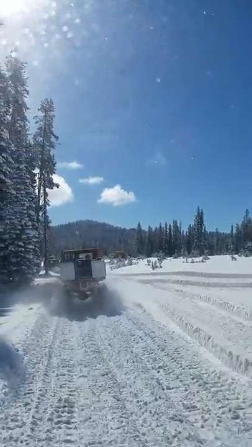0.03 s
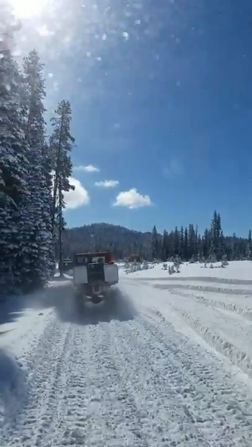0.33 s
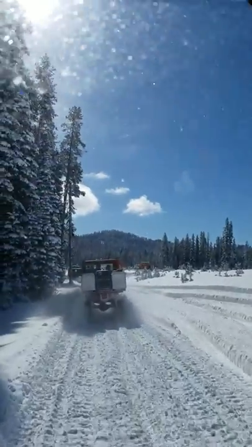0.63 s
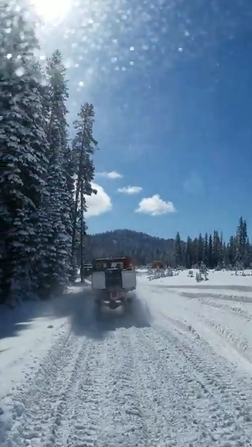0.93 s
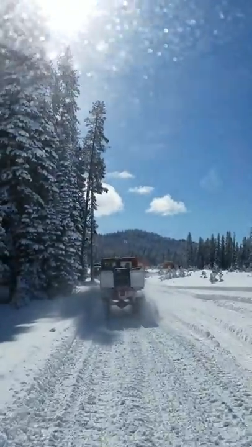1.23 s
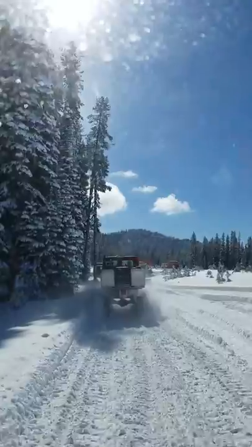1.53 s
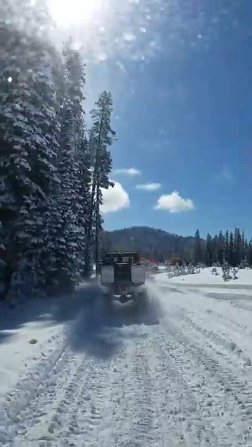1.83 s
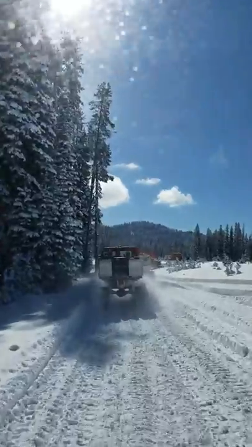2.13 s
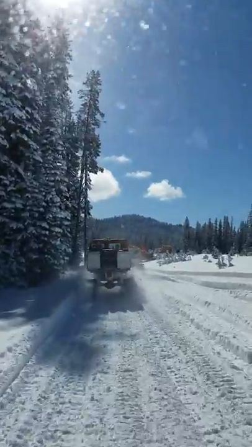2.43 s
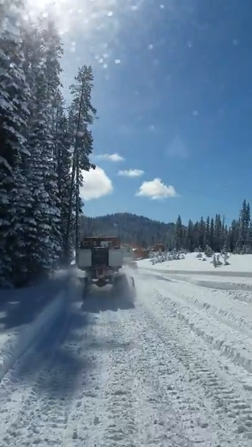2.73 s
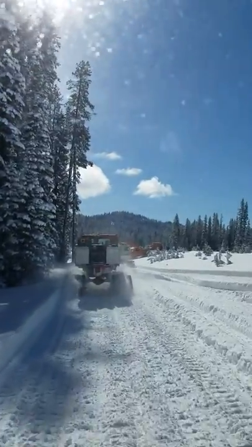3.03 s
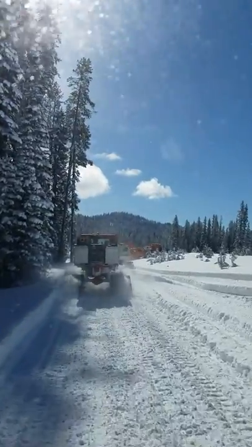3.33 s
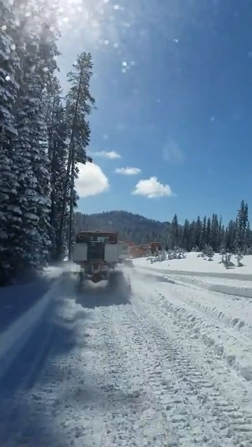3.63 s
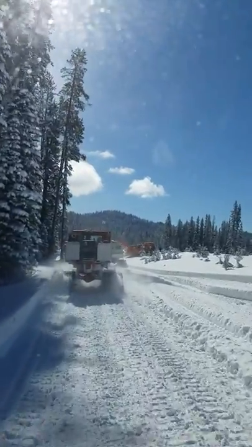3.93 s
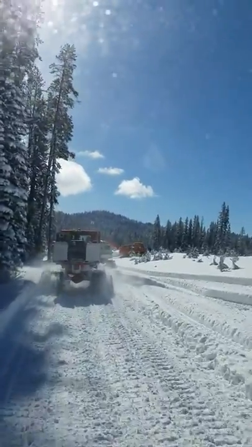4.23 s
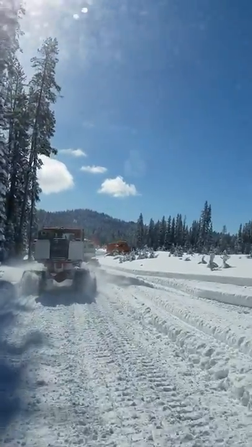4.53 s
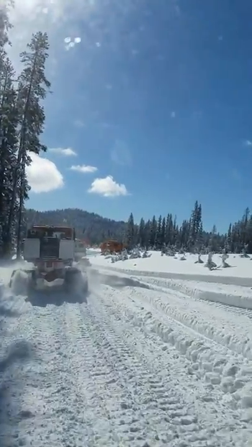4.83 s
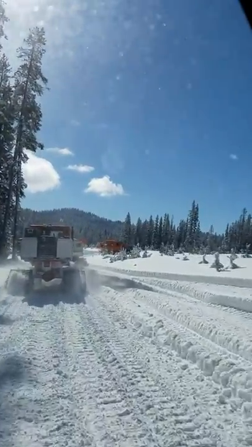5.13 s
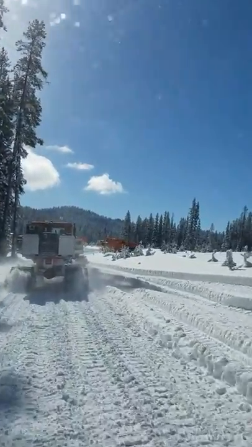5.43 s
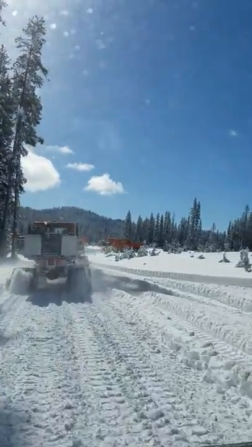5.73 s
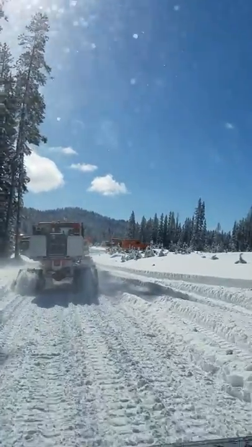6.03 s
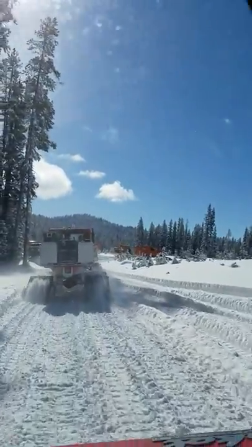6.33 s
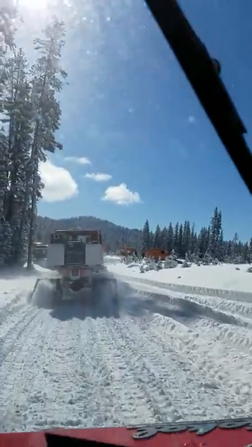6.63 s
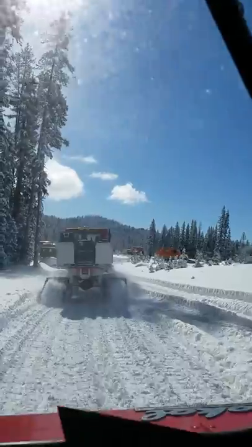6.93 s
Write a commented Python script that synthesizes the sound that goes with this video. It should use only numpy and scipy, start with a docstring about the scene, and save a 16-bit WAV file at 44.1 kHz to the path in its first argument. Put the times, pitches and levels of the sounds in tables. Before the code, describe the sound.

A tracked snow vehicle travels at an even pace, heard from inside its cab. The engine and tracks make a heavy, throbbing rumble with a very fast beat, while a thin gear whine comes and goes above grinding clatter and soft snow hiss. Irregular knocks and sharp rattles come from the hull and fittings, busier in the second half. A wiper makes one soft sweep at the end, and the bass slightly overloads the microphone.

```python
"""A deep, rapid thumping and boom fill the cab of a snowcat on a packed snow trail.
Track cleats drive the hull periodically, so it sounds harmonics of their rate; a meshing gear whines.
Links clatter and snow hisses as random forces coloured by the cab's panels. Struck fittings, links
and trim ring in damped modes, and a wiper rubs once across the windscreen.
The deepest thumps overload a microphone, so that the hiss sputters."""
import sys
import numpy as np
from scipy import signal
from scipy.fft import rfft, irfft, next_fast_len
from scipy.io import wavfile
from scipy.ndimage import uniform_filter1d

SR = 44100
rng = np.random.default_rng(int(sys.argv[2]) if len(sys.argv) > 2 else 0)


def master_out(mix):
    """Clip the mix to full scale and print it as 16-bit PCM to the path in sys.argv[1]."""
    frames = np.transpose(np.atleast_2d(mix))
    ceiling = np.clip(frames, -1, 1)
    pcm = np.round(ceiling * 32767).astype(np.int16)
    wavfile.write(sys.argv[1], SR, pcm)


N = 312669
TIME = np.arange(N) / SR
AGE = TIME[:SR // 5]  # time since a blow
FFT_SIZE = next_fast_len(N + 4096)
FREQ_HZ = np.maximum(np.arange(FFT_SIZE // 2 + 1) * SR / FFT_SIZE, 1)


def from_db(db):
    """Amplitude ratio: tenfold for every 20 dB."""
    return 10 ** (np.asarray(db) / 20)


def unit_rms(x):
    """Normalisation to unit mean power."""
    return x / np.sqrt(np.mean(x ** 2) + 1e-20)


def stereo(right_db):
    """Level difference between the microphones, as left and right gains."""
    return from_db([[0], [right_db]])


def over_time(points):
    """Linear interpolation in time."""
    return np.interp(TIME, *np.transpose(points))


def over_frequency(points):
    """Linear interpolation on a log-frequency axis."""
    hz, value = np.transpose(points)
    return np.interp(np.log(FREQ_HZ), np.log(hz), value)


def swell(centre_s, half_s):
    """Gaussian envelope, down to 1/e at half_s from its centre."""
    return np.exp(-((TIME - centre_s) / half_s) ** 2)


def drift(cutoff_hz):
    """Slow random fluctuation: low-passed noise of rms 1."""
    spectrum = rfft(rng.standard_normal(FFT_SIZE)) / (1 + (FREQ_HZ / cutoff_hz) ** 4)
    return unit_rms(irfft(spectrum, FFT_SIZE)[:N])


def impacts(per_s, spread_db):
    """Shot noise: random contacts of uneven size on each side, rms 1."""
    sizes = from_db(spread_db * np.minimum(rng.exponential(1, (2, N)), 4))
    signs = rng.choice([-1, 1], (2, N))
    return unit_rms(sizes * signs * (rng.random((2, N)) < per_s / SR))


def add(out, start_s, sound):
    """Superposition of a short sound at its time."""
    start = int(start_s * SR)
    out[start:start + len(sound)] += sound[:N - start]


def struck(modes, scale, uneven_db, contact_s=0.0005):
    """Free vibration: a blow excites damped modes unevenly; scale multiplies their frequencies."""
    ring = 0
    for k, (frequency, level_db, t60_s) in enumerate(modes):
        decay = from_db(level_db + uneven_db * rng.standard_normal() - 60 * AGE / t60_s)
        ring += (-1) ** k * decay * np.sin(2 * np.pi * scale * frequency * AGE)
    return ring * np.minimum(AGE / contact_s, 1)


def resonant_noise(rows):
    """Random excitation of resonances: each band of noise swells and fades."""
    out = np.zeros((2, N))
    for centre_s, half_s, level_db, hz, width_hz in rows:
        resonance = 1 / (1 + ((FREQ_HZ - hz * hz / FREQ_HZ) / width_hz) ** 2)
        band = irfft(rfft(rng.standard_normal((2, FFT_SIZE))) * resonance, FFT_SIZE)[:, :N]
        out += unit_rms(band) * from_db(level_db) * swell(centre_s, half_s)
    return out


# panel resonances: centre_hz, width_hz, left_db, right_db
PANEL_MODES = [(313, 20, 1, 4), (332, 17, 4.5, -1), (390, 21, 1.5, 12), (499, 45, 3.5, 6), (576, 11, -6, 6),
               (800, 47, 2, -2.5), (885, 30, 2, 0), (977, 24, -0.5, -7), (1004, 23, -2, 0),
               (1093, 26, 1.5, -17), (1240, 23, 1, -6), (1365, 27, 7, 7.5), (1440, 21, 4.5, 8),
               (1516, 42, 5, 7), (1710, 48, -2, 9.5), (2400, 79, 1.5, -1), (3580, 44, -4, 10),
               (5940, 38, 2, 3), (7440, 66, 5.5, -5), (12140, 130, -15, 2)]
# right microphone relative to left: frequency_hz, gain_db
RIGHT_BALANCE = [(28, 3.5), (70, -7), (170, -5), (360, -10.5), (900, -5), (1400, -4.5), (2500, -9.5),
                 (4500, -10.5), (6300, -16), (7400, -16.5), (8700, -4), (11000, -15), (12100, -16),
                 (14500, 0)]
# likeness of left and right: frequency_hz, correlation
CORRELATION = [(30, 0.42), (140, 0.89), (270, 0.63), (380, 0.72), (900, 0.33), (1500, -0.41), (2500, 0.11),
               (5000, -0.025), (6300, -0.51), (7400, 0.16), (9000, -0.059)]
# the cab's countless small modes roughen its response at each microphone
RIPPLE = uniform_filter1d(rng.standard_normal((2, len(FREQ_HZ))), size=400) * np.sqrt(400)
def cab(force, spectrum, ripple_db=2):
    """Source and filter: two white forces take a source's spectrum, then the cab's resonances."""
    mid, side = rfft(force, FFT_SIZE)
    alike = over_frequency(CORRELATION)
    pair = np.sqrt((1 + alike) / 2) * mid + np.sqrt((1 - alike) / 2) * side * [[1], [-1]]
    midrange = FREQ_HZ / (FREQ_HZ + 600) / (1 + (FREQ_HZ / 8000) ** 2)
    colour_db = over_frequency(spectrum) + over_frequency(RIGHT_BALANCE) * [[0], [1]]
    colour_db += ripple_db * RIPPLE * midrange
    for hz, width_hz, left_db, right_db in PANEL_MODES:
        colour_db += np.array([[left_db], [right_db]]) / (1 + (2 * (FREQ_HZ - hz) / width_hz) ** 2)
    return irfft(pair * from_db(colour_db), FFT_SIZE)[:, :N] * np.sqrt(SR / 2)


# a high sizzle: centre_s, half_length_s, level_db, pitch_hz, width_hz
SIZZLE_BAND = [(3.2, 0.33, -44.5, 7100, 200)]
def sizzle():
    """Narrow-band noise: a thin sizzle swells on a hard stretch of trail."""
    return resonant_noise(SIZZLE_BAND) * stereo(right_db=-18)


# small high chinks and cracks, one burst of icy spray: start_s, level_db, pitch_hz, crack_to_ring_db
BRIGHT_TICKS = [(1.774, -33, 12100, 3), (3.05, -42, 9300, -10), (3.407, -32, 7150, -20),
                (3.735, -36, 8640, -15), (4.737, -42, 8600, 9), (4.764, -44, 11900, 13),
                (5.033, -47, 13800, 3), (5.361, -29, 7600, -3), (5.428, -32, 7850, -6),
                (5.668, -40, 14400, -10), (6.422, -35, 8600, -15), (6.735, -45, 12100, -10)]
def ticks(ring_t60_s=0.055, crack_t60_s=0.081, attack_s=0.0012, crack_hz=12000):
    """Decaying transients: each tick is a bright crack of noise and a short, high ring."""
    out = np.zeros(N)
    highpass = signal.butter(2, crack_hz, "high", fs=SR, output="sos")
    for start_s, level_db, hz, crack_db in BRIGHT_TICKS:
        ring = from_db(-60 * AGE / ring_t60_s) * np.sin(2 * np.pi * hz * AGE)
        crack = signal.sosfilt(highpass, rng.standard_normal(len(AGE)))
        crack *= from_db(crack_db - 60 * AGE / crack_t60_s)
        add(out, start_s, from_db(level_db) * np.minimum(AGE / attack_s, 1) * (ring + crack))
    return out * stereo(right_db=-10)


# one wiper stroke: centre_s, half_length_s, level_db, pitch_hz, width_hz
WIPER_BANDS = [(6.76, 0.3, -32, 1120, 1100), (6.75, 0.34, -32, 710, 180)]
def wiper():
    """Friction noise: the blade rubs the windscreen and excites two resonances."""
    return resonant_noise(WIPER_BANDS) * stereo(right_db=-3.5)


# snow spray: frequency_hz, density_db
SNOW_SPECTRUM = [(1200, -85.5), (3000, -71.5), (4500, -78), (5400, -78.5), (6300, -72.5), (7450, -73),
                 (8200, -82), (9600, -93), (10800, -88), (12200, -84), (14200, -88), (15700, -94)]
def snow(swell_db, crunch_share=0.7):
    """Granular noise: crushed and thrown snow hisses, with icy grains in it."""
    force = rng.standard_normal((2, N)) + crunch_share * impacts(per_s=1500, spread_db=2.5)
    return cab(unit_rms(force) * from_db(swell_db), SNOW_SPECTRUM)


# pieces of loose trim: pitch_hz, level_db, t60_s
TRIM_PIECES = [(867, -40.5, 0.046), (959, -40.5, 0.06), (1078, -42.5, 0.057), (1211, -41, 0.064),
               (1278, -44.5, 0.068), (1436, -44, 0.054), (1555, -43.5, 0.048), (3540, -59, 0.085),
               (5817, -53, 0.05), (8580, -62.5, 0.07)]
def trim_buzz(swell_db):
    """Damped resonators: each piece is tapped at random, so the ringing hops from pitch to pitch."""
    out = np.zeros((2, N))
    for hz, level_db, t60_s in TRIM_PIECES:
        radius, angle = from_db(-60 / (t60_s * SR)), 2 * np.pi * hz / SR
        taps = impacts(per_s=40, spread_db=2.0) + 1e-18
        ring = signal.lfilter([1, 0, -1], [1, -2 * radius * np.cos(angle), radius ** 2], taps)
        out += from_db(level_db) * unit_rms(ring)
    return out * from_db(swell_db) * stereo(right_db=-6)


# modes of a track link: pitch_ratio, level_db, t60_s
LINK_RING = [(0.38, -5, 0.015), (0.53, -5, 0.011), (0.72, 2, 0.019), (0.87, -2, 0.012), (1, 8, 0.02),
             (1.16, 3.5, 0.011), (1.42, 10, 0.01)]
# slack links: start_s, first_peak_db, pitch_hz
LINK_RATTLES = [(0.061, -20, 2730), (0.101, -21, 3820), (0.704, -20, 3580), (0.773, -24, 2510),
                (1.255, -21, 3740), (2.556, -20, 3740), (2.68, -21, 2290), (3.24, -22, 2020),
                (4.305, -22, 1800), (4.376, -31, 3200), (4.508, -23, 3250), (4.646, -21, 1780),
                (4.764, -24, 2400), (4.9, -23, 2280), (5.028, -25, 2470), (6.432, -19, 2000),
                (6.828, -21, 3280)]
def rattles(bounces=5, gap_s=0.0041, loss_db=2.0, right_db=-16):
    """Inelastic rebound: a link bounces in quick succession, weaker and on a new spot each time."""
    out = np.zeros((2, N))
    for start_s, peak_db, hz in LINK_RATTLES:
        for k in range(bounces):
            bounce_s = start_s + gap_s * (k + .5 * rng.random())
            for side, side_db in zip(out, (0, right_db)):
                ring = struck(LINK_RING, hz * rng.uniform(.92, 1.08), uneven_db=3)
                add(side, bounce_s, from_db(peak_db + side_db - loss_db * k) * ring / np.abs(ring).max())
    return out


# modes of a fitting: pitch_ratio, level_db, t60_s
FITTING_RING = [(0.69, -3, 0.069), (0.87, 0.5, 0.046), (1, 1.5, 0.038), (1.14, -10.5, 0.03),
                (1.67, -2.5, 0.025), (1.95, -8, 0.023), (2.5, -7, 0.048), (2.85, -9, 0.015)]
# loose cab fittings: start_s, peak_db, pitch_hz
FITTING_CLACKS = [(0.037, -13.5, 960), (0.104, -24, 1150), (0.138, -15.5, 960), (1.213, -19, 1110),
                  (1.398, -18, 1100), (1.612, -19, 890), (2.274, -18, 1000), (4.263, -19, 1290),
                  (4.368, -22, 1000), (4.405, -19, 1160), (4.766, -17, 1110), (4.806, -23, 1070),
                  (4.899, -19, 2050), (4.947, -21, 1180), (5.032, -17, 1180), (5.056, -25, 4900),
                  (5.522, -17.5, 1060), (6.012, -18, 980), (6.195, -20, 1250), (6.312, -18, 890),
                  (6.764, -20, 1250), (6.843, -20, 2900), (7.015, -18, 1060)]
def clacks(right_db=-10):
    """Impulse response: a loose fitting hits its stop once and rings in inharmonic modes."""
    out = np.zeros((2, N))
    for start_s, peak_db, hz in FITTING_CLACKS:
        for side, side_db in zip(out, (0, right_db)):
            ring = struck(FITTING_RING, hz, uneven_db=5.0)
            add(side, start_s, from_db(peak_db + side_db) * ring / np.abs(ring).max())
    return out


# modes of the hull: pitch_hz, level_db, t60_s
HULL_RING = [(206, 2, 0.19), (247, 3.5, 0.074), (334, -4, 0.1), (377, -3.5, 0.17), (552, -13, 0.055),
             (910, -23, 0.034)]
# blows of the running gear: start_s, level_db
HULL_KNOCKS = [(0.507, -16.5), (0.637, -21), (1.5, -18), (2.115, -19), (2.701, -14), (2.955, -17),
               (3.32, -14.5), (4.24, -12.5), (4.726, -20), (4.939, -21), (5.79, -17), (6.024, -19),
               (6.125, -22), (6.43, -22), (6.797, -16)]
def knocks(detune=0.04):
    """Modal ringing: dull blows excite the hull, each at a slightly different spot."""
    out = np.zeros(N)
    for start_s, level_db in HULL_KNOCKS:
        ring = struck(HULL_RING, 1 + detune * rng.standard_normal(), uneven_db=1.5)
        add(out, start_s, from_db(level_db) * ring)
    return out * stereo(right_db=-10)


# shaken panels: centre_s, half_length_s, level_db, pitch_hz, width_hz
PANEL_DRONES = [(0.25, 0.18, -18, 161, 45.2), (0.36, 0.12, -28.5, 896, 111), (0.62, 0.35, -22.5, 320, 80),
                (2.98, 0.082, -22, 308, 39), (4.85, 0.28, -28, 375, 98), (6.45, 0.32, -29.5, 400, 50)]
def drones():
    """Panel resonance: bumps shake a panel into a brief drone."""
    return resonant_noise(PANEL_DRONES) * stereo(right_db=-7.5)


# whine of the gear under changing load: time_s, level_db
WHINE_LEVEL = [(0.0, -29), (0.45, -24), (0.8, -31.5), (1.1, -29), (1.5, -41.5), (1.8, -27), (2.15, -30.5),
               (2.4, -32.5), (2.7, -27.5), (3.15, -25.5), (3.6, -30.5), (4.15, -32.5), (4.42, -28),
               (4.65, -36), (4.95, -25.5), (5.4, -35.5), (5.65, -30.5), (6.7, -40), (7.09, -34)]
def gear_whine(cleats, teeth_per_cleat=16, backlash_rad=0.28, waver_db=0.3):
    """Gear mesh tone: teeth meet many times a cleat, and backlash modulates the phase."""
    phase = 2 * np.pi * teeth_per_cleat * cleats + backlash_rad * drift(7)
    level_db = over_time(WHINE_LEVEL) + waver_db * drift(8.1)
    return np.sqrt(2) * from_db(level_db) * np.sin(phase) * stereo(right_db=-10)


# track clatter: frequency_hz, density_db
CLATTER_SPECTRUM = [(150, -57), (260, -48.5), (340, -47), (440, -49), (560, -53), (660, -56.7), (1150, -60),
                    (1450, -62), (1900, -63.5), (2500, -67.5), (3500, -78), (6000, -76.5), (10000, -105)]
def clatter(swell_db, knock_share=0.33):
    """Impact noise: links and wheels knock over a dense grind."""
    force = rng.standard_normal((2, N)) + knock_share * impacts(per_s=500, spread_db=3.0)
    return cab(unit_rms(force) * from_db(swell_db), CLATTER_SPECTRUM)


# throbs of the cab's air: centre_s, half_length_s, level_db, pitch_hz
AIR_SURGES = [(0.636, 0.065, -14, 135.1), (0.925, 0.086, -11, 98.7), (0.856, 0.08, -16, 138.3),
              (1.36, 0.16, -10.5, 120), (1.883, 0.069, -12.5, 125.7), (2.893, 0.35, -13.5, 117.3),
              (3.39, 0.14, -14, 93), (4.116, 0.051, -15.5, 117.8), (4.795, 0.12, -19, 116),
              (5.115, 0.046, -16, 102.8), (5.484, 0.07, -12, 99), (6.348, 0.29, -16, 96),
              (6.96, 0.05, -15.5, 157.8)]
def surges(wander_rad=0.23):
    """Structure-to-air coupling: the shaking hull drives deep, unsteady notes that swell and fade."""
    wander = wander_rad * drift(6.3)
    out = np.zeros(N)
    for centre_s, half_s, level_db, hz in AIR_SURGES:
        phase = 2 * np.pi * (hz * TIME + rng.random()) + wander
        out += from_db(level_db) * swell(centre_s, half_s) * np.sin(phase)
    return np.sqrt(2) * out * stereo(right_db=-9)


# hull boom: frequency_hz, density_db
BOOM_SPECTRUM = [(12, -52), (22, -79), (30, -40), (44, -36), (75, -32), (98, -30.5), (119, -28.5),
                 (134, -32.5), (180, -34.5), (240, -45), (330, -55.5), (600, -96)]
# its slow swell: time_s, gain_db
BOOM_GAIN = [(0.0, -1), (0.13, 1.5), (0.45, 0), (0.7, 1.5), (1.05, -3), (1.35, -0.5), (1.95, -4.5),
             (2.3, -3.5), (2.64, -1.5), (2.73, -1), (3.1, -1.5), (3.85, -1.5), (4.0, -4), (4.15, -3.5),
             (4.6, 0), (5.1, 0.5), (5.4, -5), (5.88, -4), (6.35, 0), (6.65, -3), (6.78, -1.5), (7.0, 0)]
def boom(lift_db, evenness=0.62):
    """Forced vibration: engine and running gear shake the hull with a rough, fairly even force."""
    rumble = cab(rng.standard_normal((2, N)), BOOM_SPECTRUM)
    envelope = unit_rms(np.sqrt(uniform_filter1d(rumble[0] ** 2, SR // 40) + 1e-9))
    return rumble * from_db(over_time(BOOM_GAIN) + lift_db) / envelope ** evenness


# one track's lead on the other, in step at whole numbers: time_s, lead_cleats
LEAD = [(0.0, 0.088), (1.2, 0.3), (1.6, 0.39), (2.0, 0.4), (2.2, 0.79), (2.55, 1.07), (3.5, 1.53), (4.5, 2),
        (5.42, 2.58), (6.5, 2.95), (7.09, 3.07)]
# heaves of the hull, acting on the fundamental: centre_s, half_length_s, gain_db
HULL_HEAVES = [(0.174, 0.048, 6), (1.15, 0.08, -2), (2.41, 0.073, 6.5), (4.287, 0.038, 4.5),
               (5.948, 0.038, 6.5), (7.042, 0.071, 2.5)]
# cleat harmonics 1 to 4: in_step_db, out_of_step_db, pace_db_per_hz, right_db
CLEAT_HARMONICS = [(-16.5, -31.5, 0.5, -25), (-21.5, -18, 2, -10.5), (-23.5, -23, 1.5, -6),
                   (-22, -20.5, 0, -7)]
def thumps(pace_hz, cleats, cruise_hz=31, waver_db=2.0, slip_rad=0.57):
    """Interference: in step the tracks thump once a cleat; out of step that fades, its octave grows."""
    in_step = np.cos(np.pi * over_time(LEAD)) ** 2
    heave_db = sum(gain_db * swell(centre_s, half_s) for centre_s, half_s, gain_db in HULL_HEAVES)
    out = np.zeros((2, N))
    for k, (in_step_db, out_of_step_db, db_per_hz, right_db) in enumerate(CLEAT_HARMONICS):
        power = in_step * from_db(in_step_db) ** 2 + (1 - in_step) * from_db(out_of_step_db) ** 2
        swell_db = db_per_hz * (pace_hz - cruise_hz) + waver_db * drift(4.2)
        if k == 0:
            swell_db += heave_db
        phase = 2 * np.pi * ((k + 1) * cleats + rng.random()) + slip_rad * k * drift(3.36)
        out += np.sqrt(2 * power) * from_db(swell_db) * np.sin(phase) * stereo(right_db)
    return out


# lumps in the trail: start_s, lift_db
LUMPS = [(0.033, 2.5), (0.525, 1.5), (1.035, 3), (1.24, 2), (1.44, 1), (1.81, 1.5), (2.085, 4), (2.54, 2.5),
         (4.27, 3), (4.41, 2.5), (4.755, 1), (6.01, 1.5), (6.15, 3)]
def bump_lift_db(attack_s=0.005, decay_s=0.061):
    """Exponential relaxation: each lump lifts the level at once, then the running gear settles."""
    total_db = np.zeros(N)
    for start_s, lift_db in LUMPS:
        age = np.maximum(TIME - start_s, 0)
        total_db += lift_db * np.minimum(age / attack_s, 1) * np.exp(-age / decay_s)
    return total_db


# pace of the tracks: time_s, cleat_rate_hz
PACE = [(0.0, 29.5), (0.5, 29.75), (1.5, 31.55), (2.0, 31.5), (2.3, 31.0), (2.65, 29.9), (3.15, 30.55),
        (3.45, 30.35), (4.4, 31.7), (4.6, 31.3), (4.9, 31.95), (5.25, 31.7), (5.5, 32.3), (6.0, 32.2),
        (6.3, 32.55), (7.09, 32.1)]
# hardness of the trail: time_s, gain_db
TRAIL_HARDNESS = [(0.0, 2), (0.2, -2), (0.4, 0.7), (0.8, 1), (0.88, -0.9), (1.5, 0), (2.15, -1.8),
                  (2.42, -1.5), (2.65, -1), (3.17, 2.2), (3.55, -0.8), (3.9, 0.2), (4.15, -1.5),
                  (4.55, 0.9), (5.04, 2.5), (5.23, -1.5), (5.7, 0.2), (6.45, -0.8), (7.09, 0.7)]
def scene():
    """Common modulation: the pace tunes thumps and whine; the trail shakes clatter and snow together."""
    pace_hz, trail_db = over_time(PACE), over_time(TRAIL_HARDNESS)
    cleats = np.cumsum(pace_hz) / SR
    bump_db = bump_lift_db()
    jolts, sway = drift(32.0), drift(9.6)  # the running gear jolts fast and rocks more slowly
    beat, limp = np.sin(2 * np.pi * cleats), np.sin(np.pi * cleats)  # every cleat, every other cleat
    clatter_db = -1.5 + 0.65 * trail_db + bump_db + jolts + 0.52 * sway + 0.6 * beat
    snow_db = -0.43 + trail_db + bump_db + 1.58 * jolts + 0.74 * sway + 0.51 * beat + 0.12 * limp
    return (thumps(pace_hz, cleats) + gear_whine(cleats) + boom(0.16 * bump_db)
            + clatter(clatter_db) + snow(snow_db)
            + drones() + wiper() + sizzle() + surges()
            + knocks() + rattles() + clacks() + trim_buzz(trail_db + bump_db) + ticks())


def overload(x, deep_hz=49.0, limit=0.21, steepness=28, split_hz=134, choked_db=-12.5):
    """Saturation: deep pressure swings push a microphone to its stop, where it passes little treble."""
    deep = signal.sosfiltfilt(signal.butter(1, deep_hz, fs=SR, output="sos"), x)
    bass = signal.sosfiltfilt(signal.butter(2, split_hz, fs=SR, output="sos"), x)
    free = 1 / (1 + (np.abs(deep) / limit) ** steepness)
    return bass + (x - bass) * (free + (1 - free) * from_db(choked_db))


def record(dry):
    """Soft clipping and band limiting follow the overload of the microphones."""
    choked = overload(dry)
    rounded = choked / (1 + np.abs(choked) ** 6) ** (1 / 6)
    lowpass = 1 / np.sqrt(1 + (FREQ_HZ / 15730) ** 300)
    return irfft(rfft(rounded, FFT_SIZE) * lowpass, FFT_SIZE)[:, :N]


dry = scene()
out = record(dry)
master_out(out)
```